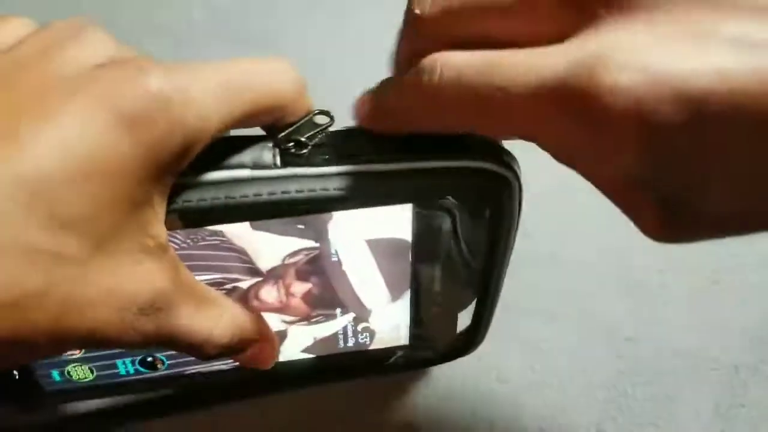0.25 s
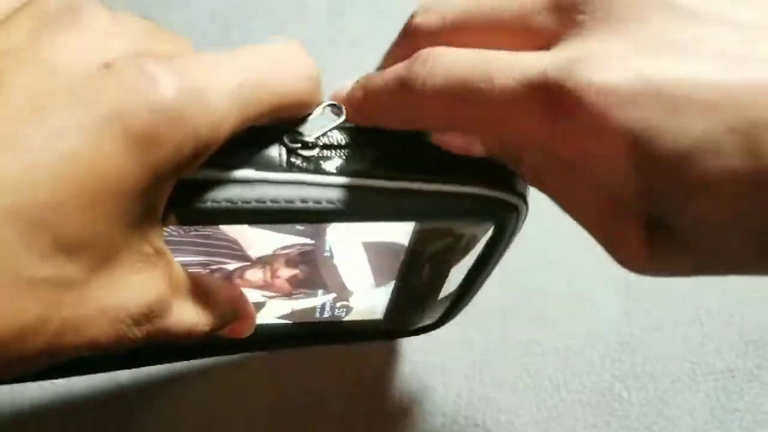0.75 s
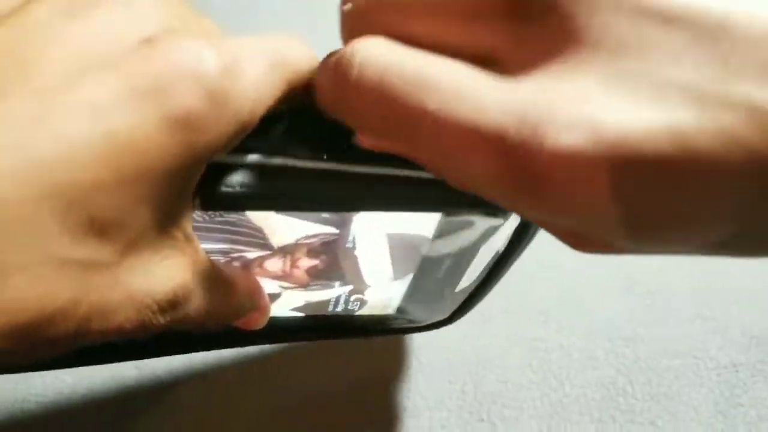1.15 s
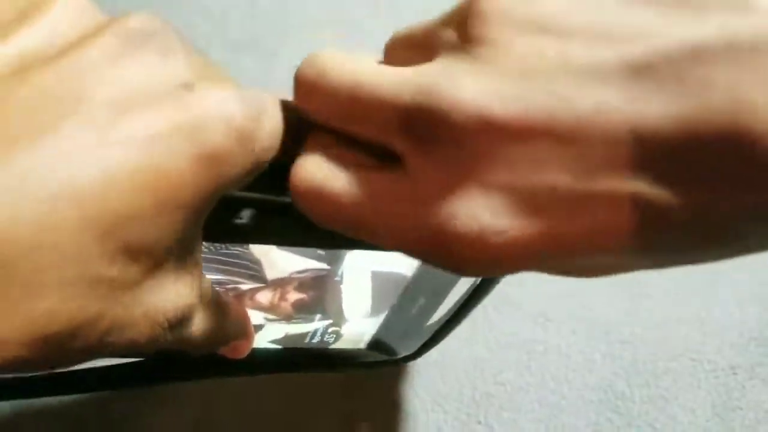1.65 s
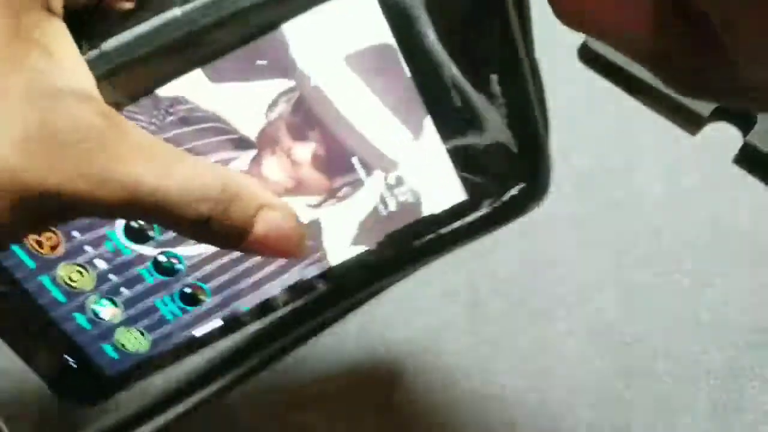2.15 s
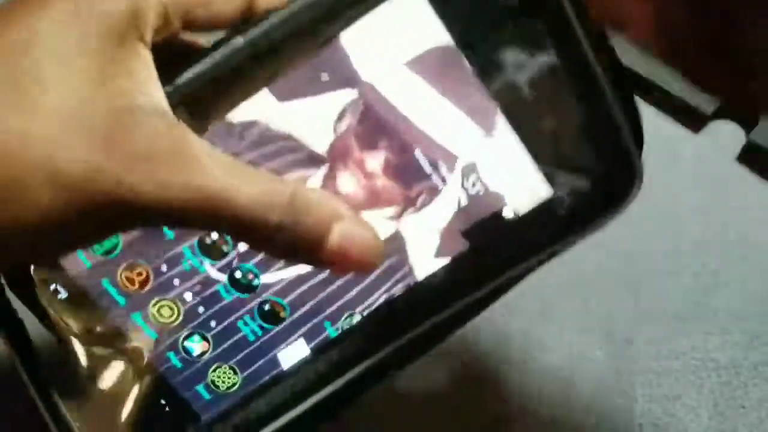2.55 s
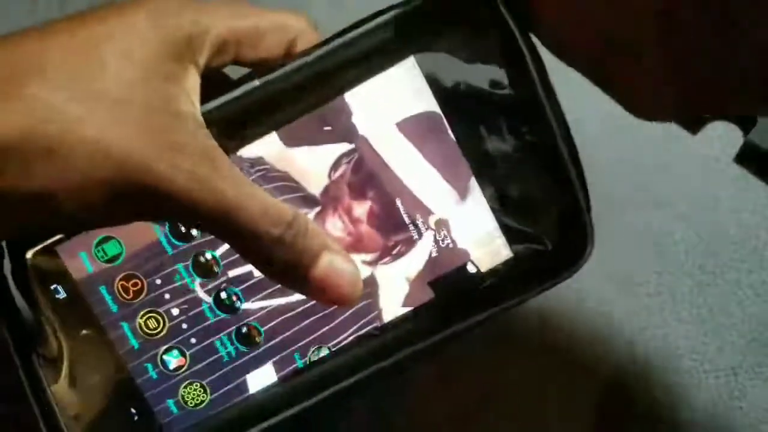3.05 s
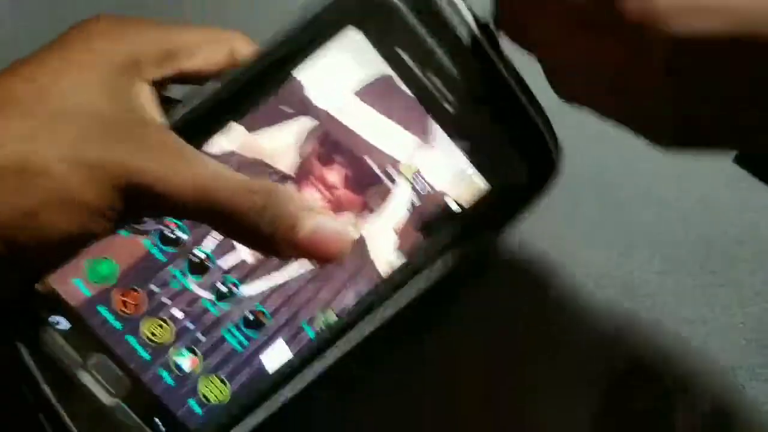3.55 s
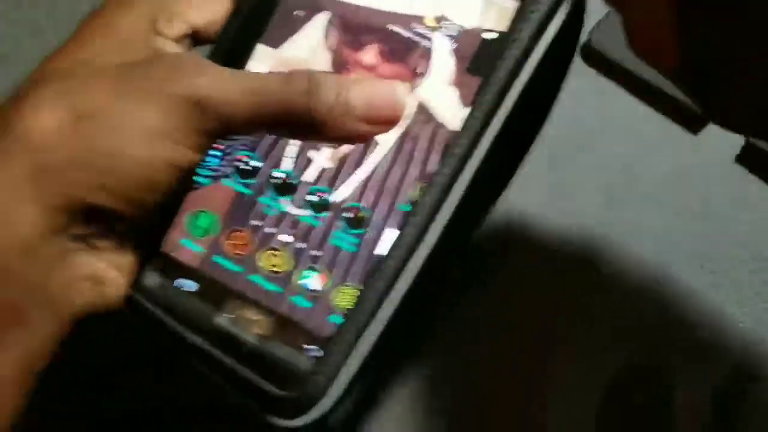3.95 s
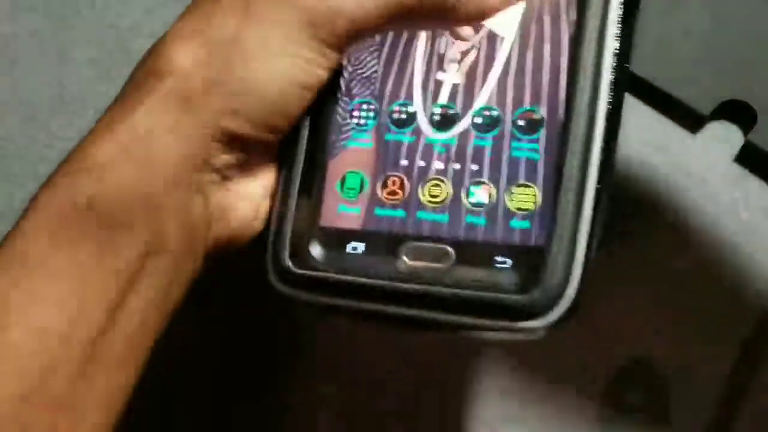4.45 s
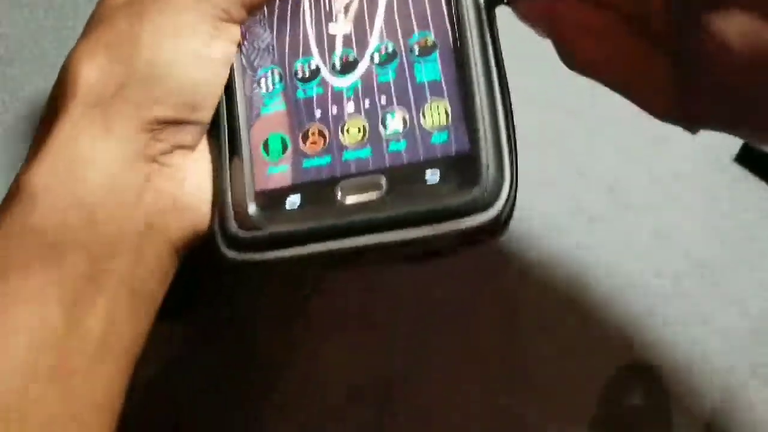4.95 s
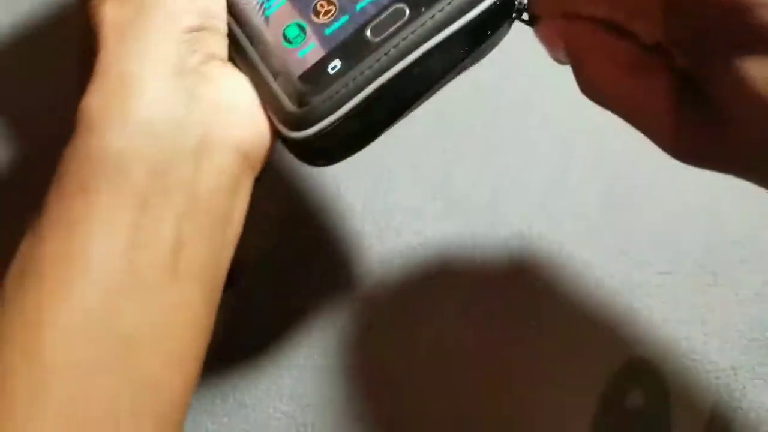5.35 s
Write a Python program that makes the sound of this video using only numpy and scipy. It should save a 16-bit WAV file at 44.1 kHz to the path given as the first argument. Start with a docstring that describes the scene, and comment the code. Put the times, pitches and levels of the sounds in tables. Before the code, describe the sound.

A stiff phone case is handled and zipped close to the microphone in a small quiet room with a faint low rumble. It opens with a tiny metallic tick and faint finger rubbing. At 1.5 seconds the zipper tab clacks sharply with a soft hollow bump. The first short zip comes at about 1.8 seconds, a raspy buzz rising and falling in pitch. From 2.2 to 3.3 seconds there are light knocks, tab clicks and soft crinkling. A quicker, higher, brighter zip at 3.5 seconds ends with a small bump. Around 4.3 seconds the grip shifts with a firmer rub and a couple of clicks. Two zips run back to back from 4.7 to 5.2 seconds, with clicks mixed in. Light rubbing and ticks follow, and a last zip starts rising at about 5.5 seconds, just as the sound ends.

```python
"""A zipper closes a stiff, waterproof phone case in five short pulls, close by in a small quiet room.
Its teeth snap together in a pulse train, so the buzz glides with the slider's speed, over the rasp
of the tape. Between pulls, impacts excite the modes of the metal tab and the hollow shell, and the
fingers of two hands rub and knock the case. Short reflections and a low rumble lie behind it all."""
import sys
import numpy as np
from scipy import signal
from scipy.fft import rfft, irfft
from scipy.io import wavfile

SR = 44100
rng = np.random.default_rng(int(sys.argv[2]) if len(sys.argv) > 2 else 0)


def digitize_waveform(pressure):
    """Quantize a signal to 16-bit integers and store it at the path in sys.argv[1].

    Rows of a 2-D input are taken as channels; values are limited to [-1, 1].
    """
    field = np.atleast_2d(pressure).T
    bounded = np.clip(field, -1, 1)
    quanta = np.round(bounded * 32767).astype(np.int16)
    wavfile.write(sys.argv[1], SR, quanta)


N = 247268
TIME = np.arange(N) / SR
FREQS = np.fft.rfftfreq(N, 1 / SR)
SIDES = np.array([[1], [-1]])  # signs of left and right


# The slider's motion, one list per pull. Each point: time in seconds, speed in teeth per second.
SLIDER_SPEEDS = [
    [(1.76, 60), (1.82, 165), (1.85, 265), (1.87, 400), (1.9, 524), (1.918, 510), (1.933, 240),
     (1.962, 180), (1.985, 65)],
    [(3.497, 70), (3.521, 285), (3.547, 455), (3.565, 495), (3.6, 750), (3.615, 800), (3.627, 700),
     (3.636, 380), (3.66, 70)],
    [(4.67, 70), (4.699, 120), (4.713, 400), (4.745, 365), (4.765, 465), (4.8, 525), (4.835, 380),
     (4.86, 205), (4.895, 110)],
    [(4.897, 135), (4.96, 170), (5.0, 320), (5.035, 385), (5.08, 580), (5.105, 655), (5.117, 540),
     (5.127, 200), (5.165, 65)],
    [(5.53, 75), (5.56, 155), (5.58, 270), (5.607, 414)],
]
# The pulls. Each row: buzz in dB, rasp in dB, change of force in dB per second, bite in dB,
# frequency in Hz above which scraping dominates, lead of the left side in seconds,
# lower and upper shell resonance in Hz, gain of the upper one in dB.
PULLS = [(-33.5, -35.5, 14, 0.5, 2300, 5e-5, 550, 2000, -12.5),
         (-32, -31.5, 60, 4, 1700, 8e-5, 563, 4100, -8), (-34, -35, -36, 0, 2350, -7e-5, 375, 1440, 4.5),
         (-35.5, -35, 10, 1.5, 1270, -3e-5, 362, 1680, 5), (-35.5, -33, 30, -0.5, 1400, 0, 480, 1400, -3)]
# Spectrum of the zipper on its shell. Each row: frequency in Hz, gain in dB.
ZIPPER_SPECTRUM = [(120, -1.5), (230, 1), (400, -7), (640, -12.5), (900, -9), (1250, -10.5), (1550, -11),
                   (2050, -7.5), (2550, -11.5), (3300, -9.5), (5200, -10.5), (6400, -15.5), (8600, -21),
                   (10800, -17.5), (16000, -31.5)]
# Directivity of the zipper. Each row: frequency in Hz, left minus right level in dB.
ZIPPER_BALANCE = [(400, 1.5), (680, 0), (1000, 5), (1600, 0.5), (4000, 3), (10000, -2)]

def zipper(split_hz=2500):
    """Source and filter: the teeth drive the shell, as loudly as speed and force make them."""
    rate = np.interp(TIME, *np.vstack(SLIDER_SPEEDS).T)
    snaps, scrape = rfft(coloured(dispersed(teeth(rate)), ZIPPER_SPECTRUM))
    balance = amp(SIDES * read(ZIPPER_BALANCE, FREQS) / 2)
    out = np.zeros((2, N))
    for speed, pull in zip(SLIDER_SPEEDS, PULLS):
        buzz_db, rasp_db, db_per_s, bite_db, rough_hz, lead_s, *resonances = pull
        # the low harmonics stay clean, the treble is mostly scraping
        clean = 1 / (1.011 + (FREQS / rough_hz) ** 3.5)
        drive = snaps * np.sqrt(clean) + 1j * scrape * np.sqrt(abs(1 - clean))
        lead = np.exp(1j * np.pi * FREQS * lead_s * SIDES)
        voiced = radiated(irfft(drive * balance * lead, N), *resonances)
        effort = force(speed, db_per_s, bite_db)
        buzz = enveloped(band(voiced, 70, split_hz), effort * speed_gain(rate, power=2.56))
        rasp = enveloped(band(voiced, split_hz, 18000), effort * speed_gain(rate, power=2.48))
        out += buzz * amp(buzz_db) + rasp * amp(rasp_db)
    return out


# Coherence of nearby friction noise. Each row: frequency in Hz, left-right correlation.
NEAR_COHERENCE = [(300, 0.96), (650, 0.55), (1100, 0.62), (3000, 0.066), (12000, -0.14)]

def teeth(rate, jitter_cycles=0.011, other_row=0.11, creep_hz=220):
    """Impact and friction: two rows of teeth snap together in turn and scrape through the slider."""
    cycles = np.cumsum(rate) / SR + jitter_cycles * wander(400)
    snaps = tooth_snaps(cycles, uneven_db=2.0) + other_row * tooth_snaps(cycles + 0.5, uneven_db=4.5)
    snaps = evened(snaps / np.sqrt(rate))
    contact = (0.57 + np.exp(-(cycles % 1) / 0.14)) * amp(0.48 * wander(230))
    scrape = evened(paired(contact * rng.standard_normal((2, N)), NEAR_COHERENCE))
    # a creeping slider mostly scrapes, a fast one snaps every tooth
    snapping = 1 / np.hypot(1, (creep_hz / rate) ** 2.9)
    return np.array([snapping * snaps + np.sqrt(1 - snapping ** 2) * scrape, scrape])


def tooth_snaps(cycles, uneven_db):
    """Pulse train: one snap of random size per cycle, placed between samples."""
    at = np.flatnonzero(np.diff(np.floor(cycles)) > 0)
    late = (np.floor(cycles[at + 1]) - cycles[at]) / (cycles[at + 1] - cycles[at])
    size = amp(uneven_db * rng.standard_normal(N))[at]
    return np.bincount(at, size * (1 - late), N) + np.bincount(at + 1, size * late, N)


def speed_gain(rate, power, full_speed_hz=418):
    """Saturating power law: the teeth hit harder as the slider speeds up, then level off."""
    return 1 / np.hypot(1, (full_speed_hz / rate) ** power)


def force(speed, db_per_s, bite_db, bite_lag_s=0.0091, bite_s=0.017):
    """Driving force: the hand tightens or eases, and the slider bites the tape just after top speed."""
    times, teeth_hz = np.transpose(speed)
    since_top = np.clip(TIME, times[0], times[-1]) - times[teeth_hz.argmax()]
    bite = np.exp(-((since_top - bite_lag_s) / bite_s) ** 2)
    return amp(db_per_s * since_top + bite_db * bite) * (TIME > times[0]) * (TIME < times[-1])


def dispersed(x, lag_s=0.001805):
    """Dispersion: higher bending waves cross the shell faster, so each snap spreads out."""
    group_delay = lag_s * np.sqrt(1000 / (FREQS + 100))  # equals lag_s at 900 Hz
    return irfft(rfft(x) * np.exp(-2j * np.pi * np.cumsum(group_delay) * SR / N), N)


def radiated(x, low_hz, upper_hz, upper_db, damping=0.4, width_hz=500):
    """Resonant radiation: the shell rings at two modes and radiates little below the lower one."""
    w = 2 * np.pi * low_hz
    x = signal.lfilter(*signal.bilinear([1, 0, 0], [1, damping * w, w * w], SR), x)
    x = band(x, 0.6 * low_hz, 20000, order=2)
    return x + amp(upper_db) * signal.lfilter(*signal.iirpeak(upper_hz, upper_hz / width_hz, SR), x)


# Modes of the metal tab and of the stiff shell. Each row: frequency in Hz, width in Hz, level in dB.
TAB_MODES = [(2650, 100, -8.5), (3300, 140, 7.5), (4020, 500, 8.5), (5000, 2100, -3.5), (11110, 540, -3.5),
             (11200, 370, 0.5)]
SHELL_MODES = [(670, 390, -13), (1337, 190, 8.5), (3440, 1600, 2.5), (4770, 790, -5), (10400, 11000, -4)]
# The knock, clack and tick bands. Each row: lower edge in Hz, upper edge in Hz.
CLICK_BANDS = [(300, 1800), (1800, 6500), (6500, 16000)]
# Impacts of tab, slider and shell. Each row: start in seconds, knock, clack and tick levels in dB,
# left minus right level in dB.
CLICKS = [(0.076, -75, -50.5, -47, 1), (0.311, -68.5, -75, -75, 8), (0.817, -71, -81, -85, 4),
          (1.283, -71.5, -71, -85, 3), (1.317, -70.5, -70.5, -85, 3.5), (1.457, -41.5, -40.5, -56, 5),
          (1.4596, -37, -29.5, -34.5, 3.5), (2.197, -58, -65.5, -86, 8), (2.221, -41.5, -82, -83, 3.5),
          (2.253, -37.5, -53.5, -82, -0.5), (2.665, -48, -39.5, -48.5, 5.5),
          (2.681, -49.5, -44.5, -48, 3.5), (2.749, -58.5, -78, -83, 5), (2.779, -43, -36.5, -38, 1),
          (2.844, -59, -57, -69, 6), (2.972, -63.5, -49.5, -61.5, 5), (3.039, -66.5, -57.5, -77, 3),
          (3.128, -63, -54, -66, 9), (3.137, -79, -41, -50, -2), (3.153, -58, -44, -35.5, -3),
          (3.164, -47, -35.5, -34, -1), (3.203, -62, -52, -67, 3), (3.217, -56.5, -57, -76, 8),
          (3.277, -95, -55.5, -74, -1), (3.643, -53, -47, -59, 2), (3.701, -50, -49, -60, 1.5),
          (4.332, -46, -40, -63, -2), (4.347, -40.5, -38, -61, 0), (4.381, -55, -51, -72, 2),
          (4.422, -50.5, -49, -79, 1.5), (4.546, -52.5, -74, -80, 5), (4.658, -59, -52.5, -62, -2),
          (4.676, -49.5, -52, -65, 4), (4.689, -40, -52, -58, 1), (4.699, -38.5, -37, -54, 6),
          (4.723, -36, -37, -50, -8), (4.868, -62, -50.5, -47, -9), (5.115, -44, -38, -37.5, 0),
          (5.329, -65, -54.5, -63, 0), (5.344, -66, -50.5, -61, 3), (5.453, -79, -58, -70, -3),
          (5.468, -91, -56.5, -74, 9), (5.54, -81, -57.5, -69, 1)]

def clicks(chatter_s=0.0021, grit=0.78, metal_db=9, thin_hz=1120):
    """Impact excitation: a blow and brief chatter ring the tab if bright, the shell if dull."""
    t = np.arange(SR // 25) / SR
    out = np.zeros((2, N + len(t)))
    for start_s, *levels_db, pan_db in CLICKS:
        knock_db, clack_db, tick_db = levels_db
        metal = 1 / (1 + amp(2 * (metal_db + knock_db - tick_db)))
        ring = metal * ringing(TAB_MODES, t) + (1 - metal) * ringing(SHELL_MODES, t)
        # a light, hard contact moves too little of the shell to make bass
        ring = band(ring, thin_hz / (1 + amp(knock_db - clack_db - 8.5)), 15000)
        chatter = grit * rng.standard_normal((3, len(t))) * np.exp(-t / chatter_s)
        shared, left, right = chatter + (t == 0)
        for (lo, hi), db, spread in zip(CLICK_BANDS, levels_db, (0.45, 1.3, 2.5)):
            blow = shared + spread * np.array([left, right])
            part = band(signal.fftconvolve(blow, ring[None])[:, :len(t)], lo, hi)
            part /= np.sqrt(np.mean(part[:, :SR // 250] ** 2, axis=1, keepdims=True))  # first 4 ms
            out[:, int(start_s * SR):][:, :len(t)] += part * amp(db + SIDES * pan_db / 2)
    return out[:, :N]


def ringing(modes, t):
    """Modal superposition: a sum of damped sines, scaled to unit energy."""
    ring = sum(amp(db) * width * np.exp(-np.pi * width * t) * np.sin(2 * np.pi * hz * t)
               for hz, width, db in modes)
    return ring / np.linalg.norm(ring)


# Spectrum of the rubbed fabric. Each row: frequency in Hz, gain in dB.
FABRIC_SPECTRUM = [(400, -8.5), (1200, 1), (2400, 1.5), (3800, 3), (5400, 1.5), (6600, -7.5), (9000, -19.5),
                   (11700, -10), (15500, -30)]
# Shifts of grip. Each row: peak time, rise and fall in seconds, crinkle in dB, hiss in dB.
RUBS = [(0.09, 0.078, 0.077, -71.5, -64), (0.29, 0.037, 0.056, -70, -71.5), (0.485, 0.1, 0.12, -76, -67.5),
        (0.76, 0.1, 0.17, -67.5, -82), (0.96, 0.058, 0.073, -62.5, -80), (1.08, 0.091, 0.038, -68, -85),
        (2.11, 0.12, 1, -73.5, -80), (2.54, 0.19, 1, -71.5, -77), (2.8, 0.12, 0.09, -57.5, -67),
        (2.96, 0.029, 0.072, -56.5, -66), (3.169, 0.36, 0.64, -68.5, -73.5),
        (3.69, 0.034, 0.25, -68.5, -77), (3.935, 0.043, 0.13, -70, -79.5), (4.135, 0.057, 0.15, -60.5, -70),
        (4.205, 0.076, 0.12, -59, -64.5), (4.335, 0.11, .085, -47.5, -55), (4.66, 0.12, 0.049, -61, -74),
        (5.195, .03, .04, -72, -70), (5.292, 0.018, 0.058, -62.5, -61), (5.35, 0.037, 0.1, -57.5, -67),
        (5.46, 0.17, 0.12, -63, -66.5)]

def fingers(cracks_per_s=70, crack_s=0.0012, creak_db=1):
    """Sliding friction: skin hisses over the fabric while the stiff cover gives in tiny cracks."""
    cracks = (rng.random(N) < cracks_per_s / SR) * amp(7.9 * np.minimum(rng.exponential(1, N), 2))
    bursts = evened(signal.lfilter([1], [1, -np.exp(-1 / (crack_s * SR))], cracks))
    pressure = amp(2 * wander(60))
    grain = paired(rng.standard_normal((2, N)), NEAR_COHERENCE)
    crinkle = evened(band(coloured((pressure + bursts) * grain, FABRIC_SPECTRUM), 400, 4600))
    hiss = evened(band(coloured(pressure * grain, FABRIC_SPECTRUM), 8000, 14000))
    rubs = np.array(RUBS)
    power = np.array([swell(*timing) for timing in rubs[:, :3]]) ** 2
    crinkle_gain, hiss_gain = np.sqrt(amp(rubs[:, 3:].T) ** 2 @ power)
    # the firmer the rub, the more the shell creaks under it
    creak = evened(band(crinkle, 1050, 2000)) * crinkle_gain ** 2 / crinkle_gain.max()
    return crinkle * crinkle_gain + hiss * hiss_gain + creak * amp(creak_db)


def swell(peak_s, rise_s, fall_s, depth_db=22.5):
    """Exponential growth and decay: a hand movement rises by depth_db to its peak, then falls."""
    return amp(-depth_db * np.maximum((peak_s - TIME) / rise_s, (TIME - peak_s) / fall_s))


# Jolts of the shell. Each row: start in seconds, level in dB.
THUDS = [(1.456, -51), (2.262, -63), (3.639, -52), (4.548, -70), (5.35, -64.5), (5.468, -67)]
# Turns of the shell in the hand. Each row: peak time, rise and fall in seconds, level in dB.
TURNS = [(2.1, 1.5, 1.2, -67), (4.7, .4, 1.4, -64), (5.42, 0.27, 0.32, -64)]

def shell_boom(ring_s=0.027, low_hz=100, high_hz=245):
    """Forced vibration: the hollow case booms softly in a low band when jolted or turned."""
    jolts = sum(amp(db) * (TIME >= s) * np.exp(-abs(TIME - s) / ring_s) for s, db in THUDS)
    turning = sum(amp(db) * swell(*timing) for *timing, db in TURNS)
    push = rng.standard_normal(N) * (jolts + turning)
    return band(push, low_hz, high_hz, order=2) * np.sqrt(SR / 2 / (high_hz - low_hz))


# Reverberation of the room. Each row: frequency in Hz, time to fall 60 dB in seconds.
ROOM_DECAY = [(800, 0.15), (3500, 0.18), (8000, 0.16), (15000, 0.18)]

def room(x, bounce_s=0.0082):
    """Reflection and reverberation: a scattered bounce off a nearby surface, then a short tail."""
    t = np.arange(SR // 2) / SR
    hz, frame_s, spectra = signal.stft(rng.standard_normal((2, len(t))), SR, nperseg=256)
    decay = amp(-60 * frame_s / read(ROOM_DECAY, hz)[:, None])
    tail = signal.istft(spectra * decay, SR, nperseg=256)[1][:, :len(t)]
    tail *= np.minimum(t / 0.0018, 1)
    bounce = rng.standard_normal(tail.shape) * np.exp(-abs(t - bounce_s) / 0.0052)
    response = amp(-12) * tail / np.linalg.norm(tail[0]) + amp(-14) * bounce / np.linalg.norm(bounce[0])
    reflected = signal.fftconvolve(x, response, axes=1)[:, :N]
    return coloured(reflected, [(400, 5), (1200, 2.5), (3500, 1), (12000, 0.5)])  # lifts the bass most


# Spectrum of the background. Each row: frequency in Hz, relative spectral density in dB.
NOISE_SPECTRUM = [(12, -48), (20, -22.5), (81, -2), (172, -14.5), (198, -17), (357, -24), (678, -33.5),
                  (976, -35.5), (1570, -35.5), (11100, -38.5), (16000, -36)]
# Coherence of the background. Each row: frequency in Hz, left-right correlation.
NOISE_COHERENCE = [(250, 0.89), (800, 0.2), (2500, 0.06)]

def room_noise(level_db=-65):
    """Stationary noise: a low rumble under a faint hiss."""
    noise = coloured(paired(rng.standard_normal((2, N)), NOISE_COHERENCE), NOISE_SPECTRUM)
    return amp(level_db) * evened(noise)


def amp(db):
    """Decibels to gain."""
    return 10 ** (np.asarray(db) / 20)


def evened(x):
    """Normalisation to rms 1."""
    return x / np.sqrt(np.mean(x ** 2) + 1e-20)


def read(points, hz):
    """Interpolation on a log-frequency axis."""
    f, value = np.transpose(points)
    return np.interp(np.log(hz + 1), np.log(f + 1), value)


def band(x, lo_hz, hi_hz, order=3):
    """Causal band-pass."""
    sections = signal.butter(order, [lo_hz, min(hi_hz, 0.49 * SR)], "band", fs=SR, output="sos")
    return signal.sosfilt(sections, x)


def coloured(x, points):
    """Minimum-phase filter of the given spectrum: a click rings only after it starts."""
    log_gain = np.log(amp(read(points, abs(np.fft.fftfreq(N, 1 / SR)))))
    response = np.exp(np.conj(signal.hilbert(log_gain)))[:len(FREQS)]
    return irfft(rfft(x) * response, N)


def paired(x, coherence):
    """Partial coherence: two unrelated signals blend into a left and right of given correlation."""
    a, b = rfft(x)
    angle = np.arccos(np.clip(read(coherence, FREQS), -1, 1)) / 2
    return irfft(a * np.cos(angle) + SIDES * b * np.sin(angle), N)


def wander(rate_hz):
    """Low-passed noise: a smooth random drift of rms 1."""
    return evened(irfft(rfft(rng.standard_normal(N)) * np.exp(-(FREQS / rate_hz) ** 2), N))


def enveloped(x, gain):
    """Amplitude modulation: the sound follows a gain curve and takes on its rms."""
    return x * gain * np.sqrt(np.mean(gain ** 2) / np.mean((x * gain) ** 2))


def scene():
    """Superposition of the direct sound, its reflections and the background."""
    near = zipper() + clicks() + fingers() + shell_boom()
    return near + room(near) + room_noise()


def record(dry):
    """Band limiting: a linear-phase low-pass at 16 kHz."""
    low_pass = signal.firwin(511, 16000, window=("kaiser", 9), fs=SR)
    return signal.oaconvolve(dry, low_pass[None], "same")


dry = scene()
out = record(dry)
digitize_waveform(out)
```